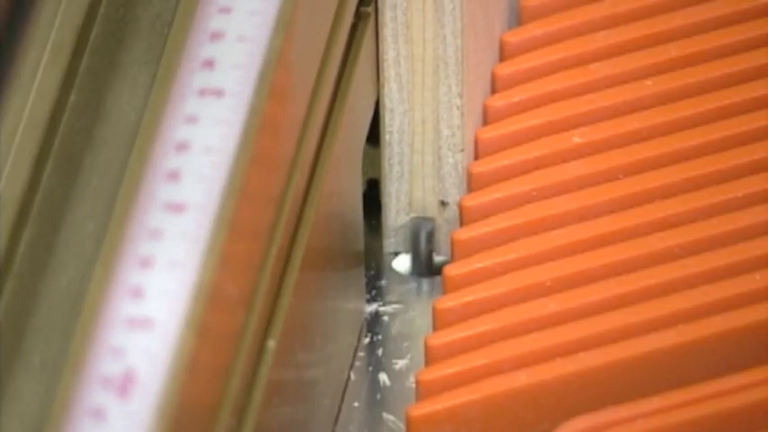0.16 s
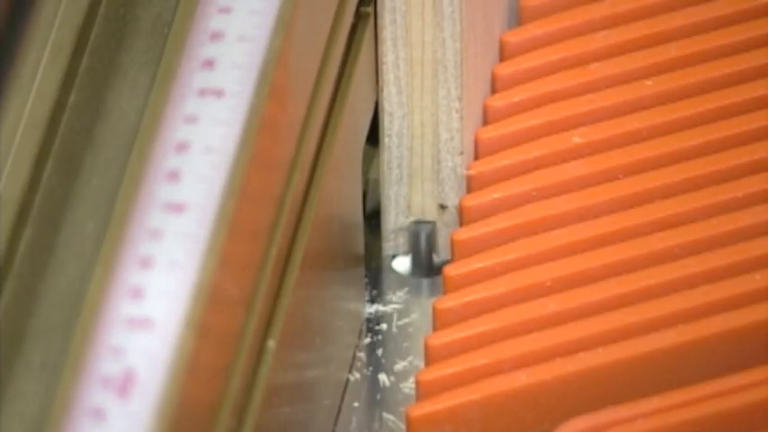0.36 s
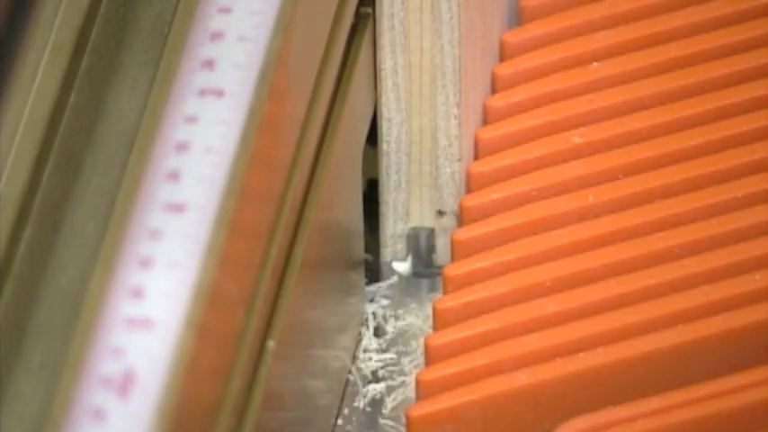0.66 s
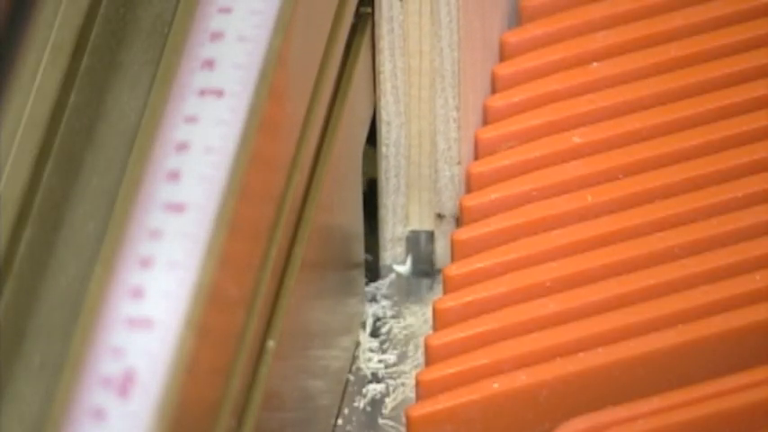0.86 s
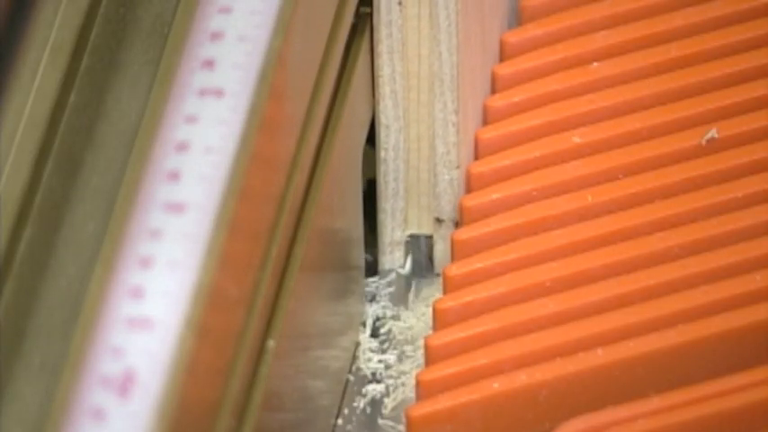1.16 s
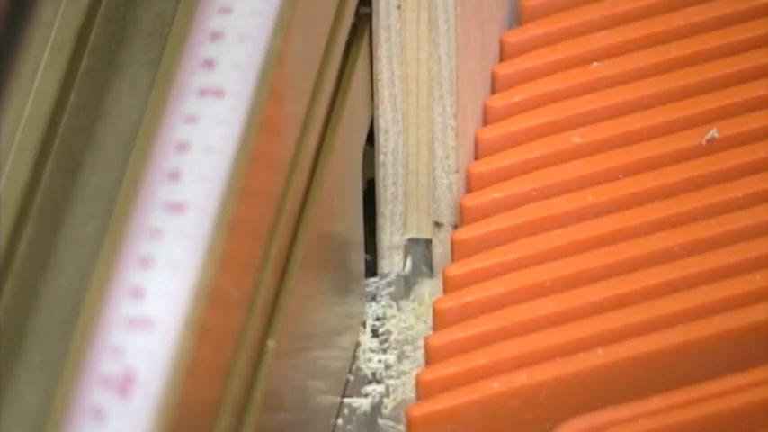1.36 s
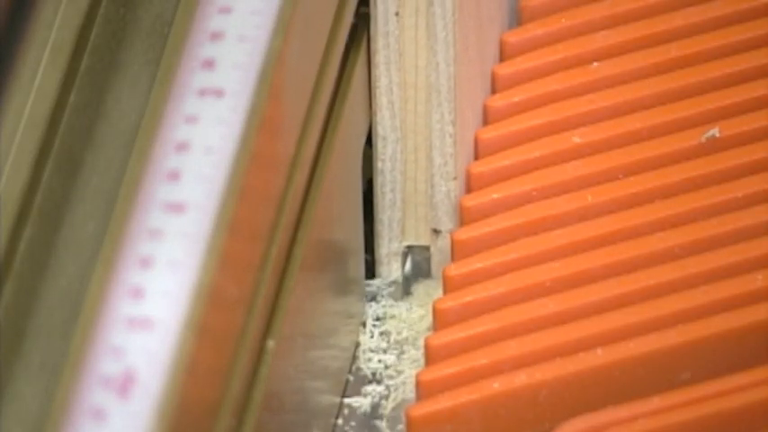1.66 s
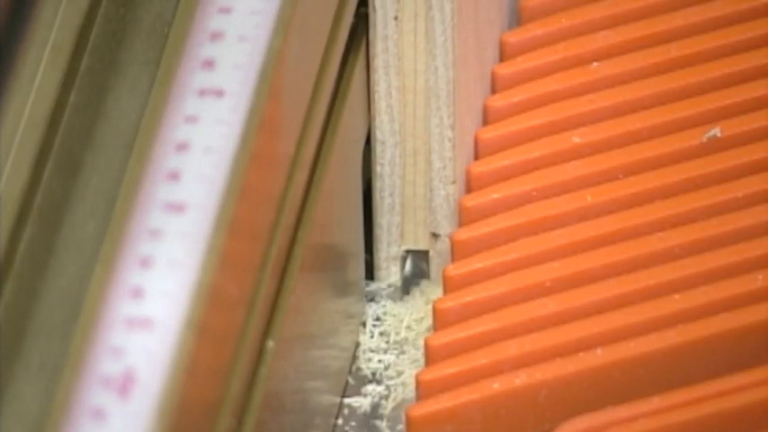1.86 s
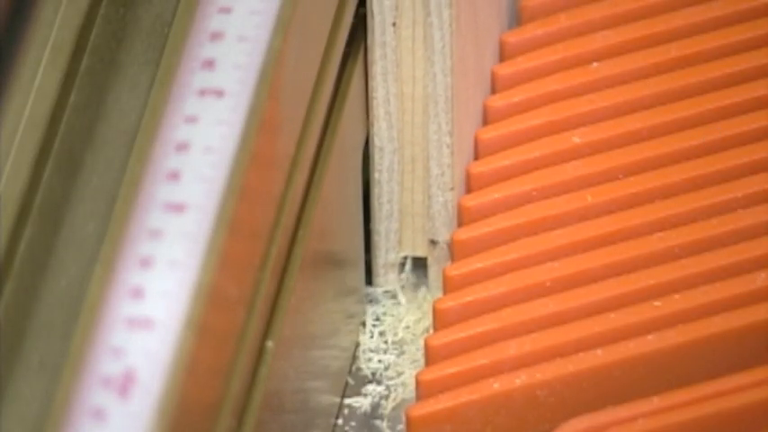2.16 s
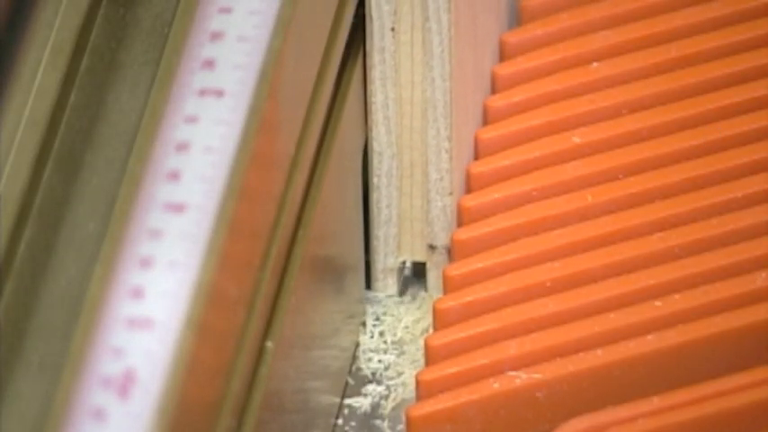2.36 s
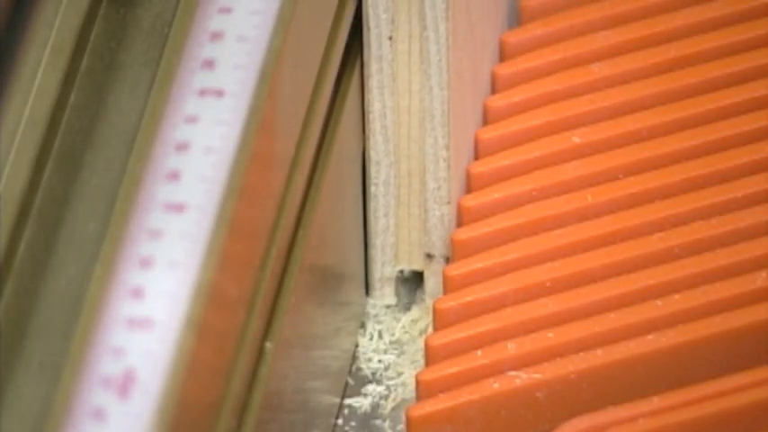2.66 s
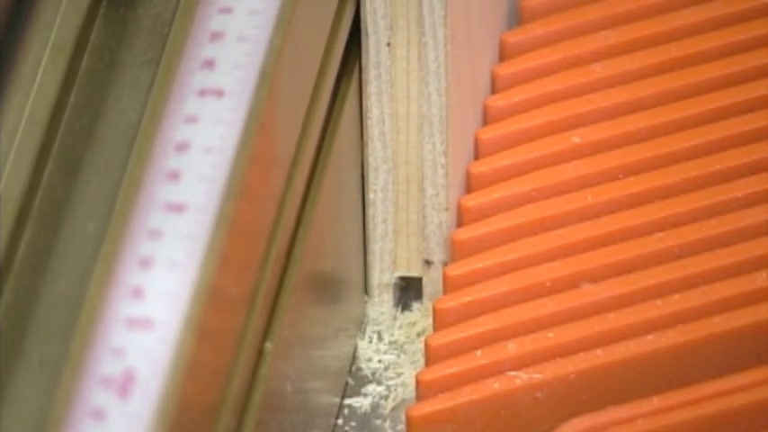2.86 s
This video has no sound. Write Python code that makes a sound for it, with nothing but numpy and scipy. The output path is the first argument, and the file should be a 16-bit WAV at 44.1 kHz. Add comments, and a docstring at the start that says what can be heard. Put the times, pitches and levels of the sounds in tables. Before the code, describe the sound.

A router under a table idles for an instant with whirring fan air, then its bit enters plywood and screams in a bright, rough buzz that turns duller and grittier; close stereo microphone, small workshop.

```python
"""First the idle of a router under a table, all fan air, motor tones and mains hum; then its bit bites into plywood.
One blow per turn of the shaft, a stack of overtones, rings the bit and drums the board. Tearing fibres, noise gated
by the turns, hiss in step with it, and the shaft slows a little under load. A soft thud and a low rumble come
through the table. A small stereo microphone stands near, in a workshop heard as a short tail of noise."""
import sys
import numpy as np
from scipy import signal
from scipy.fft import rfft, irfft, next_fast_len
from scipy.io import wavfile
from scipy.ndimage import uniform_filter1d, map_coordinates

SR = 44100
rng = np.random.default_rng(int(sys.argv[2]) if len(sys.argv) > 2 else 0)


def dump_mix(stems):
    """Bounce the given channels to the path in sys.argv[1] as a 16-bit WAV at rate SR."""
    frames = np.atleast_2d(stems).T  # one column per channel
    limited = np.clip(frames, -1, 1)  # hard clip at full scale
    pcm = np.round(limited * 32767).astype(np.int16)
    wavfile.write(sys.argv[1], SR, pcm)


def how_loud(loudness_db):
    """Turn decibels into a plain amplitude multiplier (0 dB gives 1, 20 dB gives 10)."""
    steps = np.asarray(loudness_db, float) / 20
    return 10 ** steps


N = 132300  # samples, 3 s
BITE_S = 0.1103  # the bit meets the wood

# Left-right likeness of the noises: pitch_hz, likeness (1 = same in both)
LIKENESS = [(60, 0.12), (250, 0.16), (600, 0.27), (2000, 0.8), (5000, 1), (9000, 0.44), (13000, 0.012)]
# Rumble through the table, relative: pitch_hz, level_db (per Hz)
TABLE_RUMBLE = [(12, -31), (20, 4), (38, -2), (113, -2), (130, -15), (170, -36), (290, -120)]
# Cooling air, relative: pitch_hz, level_db (per Hz)
COOLING_AIR = [(90, -50), (140, -22), (380, -4), (650, 0), (1000, -2), (2000, -8), (2700, -12), (3300, -15),
               (3900, -23), (5000, -19), (7000, -24), (15600, -32)]
# Motor tones, relative: shaft_multiple, level_db, left_over_right_db
MOTOR_TONES = [(1, -50, 9), (12, -28.5, 0), (15, -45, 0)]
# Mains hum, relative: pitch_hz, level_db
MAINS_HUM = [(240, -48), (360, -42)]
# Shaft speed before its small waver: time_s, turns_hz (per second)
SHAFT_SPEED = [(0, 163.3), (.15, 163.2), (.4, 162.65), (.76, 161.7), (1.14, 160.95), (1.55, 160.65),
               (1.95, 160.55), (2.3, 160.75), (2.65, 161.0), (3, 161.2)]
# Steady tones of the board, multiples of the shaft speed: shaft_multiple
BOARD_MULTIPLES = (2, 5, 9, 7, 11)
# Their phase, left ahead and right behind by this much: lead_rad
BOARD_LEAD_RAD = [0.6, .3, 0.23, .3, .25]
# Their relative levels: time_s, then one level_db for each of BOARD_MULTIPLES
BOARD_HUM = [(0.12, -39.5, -33.5, -41, -35.5, -39), (0.37, -47, -48.5, -48, -35, -44),
             (0.63, -38.5, -25.5, -43, -29.5, -30), (0.94, -37, -43, -38.5, -43, -35.5),
             (1.04, -34.5, -33.5, -29, -35, -32), (1.45, -34.5, -30.5, -38.5, -38, -33),
             (2.3, -31, -34.5, -39.5, -44.5, -36.5), (2.5, -30.5, -31, -32.5, -38, -33),
             (3.0, -31.5, -35.5, -29.5, -36, -28)]
# Resonances of the buried bit: pitch_hz, half_width_hz, level_db (relative)
BIT_RESONANCES = [(2555, 55, 0), (2365, 70, -2)]
# Tearing fibres, relative: pitch_hz, level_db (per Hz)
FIBRE_HISS = [(170, -24), (400, -12), (700, -8), (1300, -6), (2000, -7), (2500, -5), (3300, -10),
              (4600, -8), (5600, -9.5), (7000, -12), (10500, -15), (12500, -21), (15600, -38)]
# How ragged the cut is: time_s, tearing_over_blows_db
RAGGEDNESS = [(.12, -6), (.25, -14), (.6, -10.5), (.9, -4), (1.15, -8), (1.3, -9), (1.5, -5), (1.76, -2),
              (2.0, -4), (2.75, 1), (3.0, 0)]
# Rings of the opening slot: time_s, lower_centre_hz, upper_centre_hz
SLOT_RINGS = [(.12, 2450, 4600), (.22, 2500, 4560), (.34, 2500, 4950), (.52, 2900, 5000), (.62, 2900, 4560),
              (.7, 2900, 4560), (.76, 2560, 4600), (.9, 2600, 4600)]
# Overtones of the blow, relative: shaft_multiple, entering_db, buried_db
BLOW_OVERTONES = [(3, -9, -8), (4, -13, -1), (6, -16, -14), (8, -13, -4), (10, -15, -10), (12, -13, -15),
                  (13, -12, -14), (14, -8, -15), (15, 1, -13), (16, 0, -2), (17, -2, -5), (18, 0, -7),
                  (19, -3, -8), (20, -6, -4), (21, -7, -6), (22, -13, -9), (23, -9, -7), (24, -9, -20),
                  (25, -6, -11), (26, -3, -6), (27, -7, -4), (28, -1, -6), (29, -3, -9), (30, -1, -8),
                  (31, 0, -2.5), (32, -5, -2), (33, -5, -13), (34, -4, -6), (35, -10, -10), (36, -6, -7),
                  (37, -8, -15), (38, -11, -16)]
# The cut, before its quick swells: time_s, board_drumming_db, bit_ring_db, treble_bite_db, top_hiss_db
CUT_LEVELS = [(0.12, -29, -17, -15, -25.5), (0.21, -31, -18.5, -18, -26), (0.37, -37, -17, -21.5, -28),
              (0.66, -25.5, -20, -21, -26.5), (0.81, -21.5, -19, -20, -27.5), (0.92, -29, -23, -25, -33),
              (1.05, -24, -20.5, -21, -27.5), (1.23, -26.5, -20.5, -23.5, -28.5),
              (1.27, -17, -20, -20, -27.5), (1.34, -29.5, -24, -20, -29.5), (1.4, -24, -25, -20, -27.5),
              (1.7, -23.5, -21, -22.5, -29.5), (1.78, -18.5, -20, -22.5, -28.5),
              (1.84, -26, -24, -26.5, -33.5), (1.96, -18.5, -20.5, -23.5, -28.5),
              (2.28, -24, -22, -25.5, -31), (2.36, -21, -19, -23, -29.5), (2.75, -19, -23.5, -28, -32),
              (3.0, -22, -21.5, -26, -32.5)]
# Balance of the microphone: pitch_hz, left_over_right_db
MICROPHONE_BALANCE = [(60, 6), (180, 5.5), (550, -0.5), (1650, -2), (4970, -1.5), (15000, -1.0)]


def unit(x):
    """Scaled to rms 1."""
    return x / np.sqrt(np.mean(x ** 2) + 1e-20)


def along(points, hz):
    """Reads (Hz, value) points on a log frequency axis."""
    point_hz, value = np.transpose(points)
    return np.interp(np.log(hz + 1), np.log(point_hz + 1), value)


def curves(rows):
    """One value per sample for each column after the time."""
    s, *columns = np.transpose(rows)
    return [np.interp(np.arange(N) / SR, s, column) for column in columns]


def wobble(rate, size=1):
    """A smooth random curve, rate knots a second, one value every size samples."""
    knots = rng.standard_normal(int(N * rate / SR) + 4)
    return map_coordinates(knots, [np.arange(0, N, size) * rate / SR])


def filtered(x, response):
    """x times a response of frequency."""
    m = 2 * next_fast_len(N // 2 + 8192)
    return irfft(rfft(x, m) * response(np.fft.rfftfreq(m, 1 / SR)), m)[..., :N]


def patchy(x, depth_db, bins=3, frames=10):
    """Random patches of gain over time and frequency."""
    z = signal.stft(x, nperseg=1024, noverlap=768)[2]
    field = uniform_filter1d(rng.standard_normal(z.shape[-2:]), size=bins, axis=0)
    field = uniform_filter1d(field, size=frames, axis=1)
    return signal.istft(z * how_loud(depth_db * unit(field)), nperseg=1024, noverlap=768)[1][..., :N]


def rush(spectrum):
    """Stereo noise of rms 1: mid and side are shared out so that left and right are partly alike."""
    def mid_side(hz):
        turn = np.arccos(np.clip(along(LIKENESS, hz), -1, 1)) / 2
        return how_loud(along(spectrum, hz)) * [np.cos(turn), np.sin(turn)]

    mid, side = filtered(rng.standard_normal((2, N)), mid_side)
    return unit(np.array([mid + side, mid - side]))


def room(x):
    """The workshop's answer: a noise tail that falls 60 dB in 0.22 s, starting after 4 ms."""
    t = np.arange(SR // 2) / SR
    tail = rng.standard_normal((2, len(t))) * how_loud(-60 * t / .22) * (t > .004)
    return signal.fftconvolve(x[None], tail / np.linalg.norm(tail[0]), axes=1)[:, :N]


def table():
    """Steady rumble through the table, with a decaying low sine as the thud of the first bite."""
    thud_db, thud_hz, thud_t60_s = -46, 32, 0.28
    rumble_db = -66
    t = np.maximum(np.arange(N) / SR - BITE_S, 0)
    thud = how_loud(thud_db - 60 * t / thud_t60_s) * np.sin(2 * np.pi * thud_hz * t)
    return thud + how_loud(rumble_db) * rush(TABLE_RUMBLE)


def motor(turns):
    """Cooling air as patchy noise, shaft and fan tones locked to the turns, mains hum at fixed pitches."""
    air_db = -24.5  # at idle
    loaded_db, loaded_s = -3, 0.093  # air and tones sink back once the cut starts
    t = np.arange(N) / SR
    air = how_loud(air_db + 0.27 * wobble(8.6)) * unit(patchy(rush(COOLING_AIR), depth_db=4.0))
    tones = 0
    for k, db, pan_db in MOTOR_TONES:
        pan = np.array([[pan_db / 2], [-pan_db / 2]])
        tones = tones + how_loud(db - 3.5 + 1.4 * wobble(8.93) + pan) * np.sin(2 * np.pi * k * turns)
    sink = how_loud(loaded_db * np.clip((t - BITE_S) / loaded_s, 0, 1))
    mains = sum(how_loud(db - 5 + 3.0 * wobble(7.5)) * np.sin(2 * np.pi * hz * t) for hz, db in MAINS_HUM)
    return sink * (air + tones) + mains


def buried(t):
    """How far the bit is in, 0 at 0.31 s to 1 at 0.88 s."""
    from_s, to_s = 0.31, 0.88
    return np.clip((t - from_s) / (to_s - from_s), 0, 1)


def board_hum(turns):
    """The board's steady tones: multiples of the shaft speed, left a little ahead of right in phase."""
    side = np.array([[1], [-1]])
    hum = 0
    for k, db, lead in zip(BOARD_MULTIPLES, curves(BOARD_HUM), BOARD_LEAD_RAD):
        size = how_loud(db + 5.5 + 0.31 * k * wobble(12))
        phase = 2 * np.pi * k * turns + lead * side + 0.15 * wobble(12)
        # dividing by cos(lead) keeps the sum of left and right as strong
        hum = hum + size * np.cos(phase) / np.cos(lead)
    return hum


def chatter():
    """The bit's own resonances: narrow noise shaken in quick uneven bursts, growing as it buries itself."""
    bursts_db, swing_db, bursts_rate = -10.5, 3.5, 30  # before the cut is levelled; rate in knots per second
    modes = 0
    for hz, width_hz, db in BIT_RESONANCES:
        ringing = filtered(rng.standard_normal(N), lambda f: 1 / (1 + ((f - hz) / width_hz) ** 2))
        modes = modes + how_loud(db) * unit(how_loud(swing_db * wobble(bursts_rate)) * ringing)
    return how_loud(bursts_db) * buried(np.arange(N) / SR) * modes


def fibres(turns):
    """Tearing fibres: noise that jumps up at each turn of the shaft and sinks to half before the next."""
    gate_depth, gate_sharp = .5, 3.5
    gate = 1 - gate_depth + gate_depth * np.exp(-gate_sharp * (turns % 1))
    return unit(patchy(rush(FIBRE_HISS) * gate, depth_db=0.5, bins=9, frames=8))


def blows(turns, speed_hz):
    """The blow once a turn as overtones that waver apart; its colour changes as the bit buries itself."""
    step = 64  # samples between slow control values
    highest, fall_db = 66, -.55  # overtones past the table, below this multiple, fade by this step
    slot_db, slot_width_hz = 6, 250
    dull_hz, dull_db = 2100, -6  # late in the cut, from 2.25 to 2.6 s, the overtones above dull_hz sink
    samples = np.arange(N)
    at = np.arange(0, N, step)
    depth = buried(at / SR)

    def deepening(entering, in_wood):
        return np.interp(depth, [0, 1], [entering, in_wood])

    waver_db, flutter_db = deepening(2.2, 1.5), deepening(1.6, 3)  # slow and quick
    smear_rad = deepening(.9, 1.15)  # spread of the overtone phases
    sinking_db = np.interp(at / SR, [2.25, 2.6], [0, dull_db])
    slots_hz = np.array(curves(SLOT_RINGS))[:, at]
    last, *last_db = BLOW_OVERTONES[-1]
    more = [(k, *(np.array(last_db) + fall_db * (k - last))) for k in range(last + 1, highest)]
    out = np.zeros((2, N))
    for k, entering_db, buried_db in BLOW_OVERTONES + more:
        hz = k * speed_hz[at]
        nearness = np.exp(-((hz - slots_hz) / slot_width_hz) ** 2).sum(0)
        level_db = entering_db + depth * (buried_db - entering_db) + (1 - depth) * slot_db * nearness
        size = how_loud(level_db + waver_db * wobble(4.75, size=step) + flutter_db * wobble(24.23, size=step))
        phase = smear_rad * rng.normal() + .3 * wobble(15, size=step)
        apart = .28 * (rng.normal() + wobble(3.865, size=step))  # left-right spread, rad
        dulling = np.interp(samples, at, how_loud(sinking_db * (hz > dull_hz)))
        tone = np.exp(2j * np.pi * k * turns) * dulling
        for channel, way in enumerate((1, -1)):
            control = size * np.exp(1j * (phase + way * apart))
            out[channel] += (np.interp(samples, at, control) * tone).real
    # held to an even level over a quarter of a second
    return out / np.sqrt(np.abs(uniform_filter1d(np.mean(out ** 2, 0), size=SR // 4)))


def cutting(turns, speed_hz):
    """Blows and tearing, shared out between board, bit, bite and hiss, over the board's hum."""
    edges_hz = (330, 1950, 3850, 7000, SR)  # between drumming, ring, bite and hiss
    rise_s = 0.0069
    graze_s, graze_share = 0.014, 0.086  # the edge grazes the wood just before it bites
    knock = blows(turns, speed_hz)
    tearing = how_loud(curves(RAGGEDNESS)[0]) * fibres(turns)
    mix = knock + how_loud(-11) * room(knock.mean(0)) + tearing + chatter()

    def band_shapes(hz):
        lowpasses = np.array([1 / (1 + (hz / edge) ** 12) for edge in edges_hz])
        return np.diff(lowpasses, axis=0)[:, None]

    bands = filtered(mix[None], band_shapes)
    # each band is levelled over a fifth of a second, then follows its column of the table
    power = uniform_filter1d(np.mean(bands ** 2, 1, keepdims=True), size=SR // 5)
    bands = bands / np.sqrt(np.abs(power))
    levels_db = np.array(curves(CUT_LEVELS)) + 1.1 * np.array([wobble(21.85) for _ in bands])
    parts = np.sum(how_loud(levels_db)[:, None] * bands, 0)
    swell = how_loud(.5 * wobble(11.13) + 0.76 * wobble(30.51))
    since = np.arange(N) / SR - BITE_S
    graze = graze_share * np.clip(1 + since / graze_s, 0, 1)
    start = np.maximum(np.clip(since / rise_s, 0, 1), graze)
    return start * (swell * parts + board_hum(turns))


def scene():
    """Everything at the microphone, tones and blows driven by the one turning shaft."""
    speed_hz = curves(SHAFT_SPEED)[0] * (1 + .00025 * wobble(10))
    turns = np.cumsum(speed_hz) / SR
    return table() + motor(turns) + cutting(turns, speed_hz)


def low_pass(x):
    """Removes everything above the highest recorded frequency."""
    return signal.sosfilt(signal.butter(12, 15760, fs=SR, output="sos"), x)


def record(dry):
    """The stereo microphone: left-right balance, a narrow dip in its response, peaks rounded at the input."""
    dip_hz, dip_width_hz, dip_db = 3890, 95, -9.5
    ceiling = .95  # of full scale
    side = np.array([[.5], [-.5]])

    def response(hz):
        dip = dip_db / (1 + ((hz - dip_hz) / dip_width_hz) ** 2)
        return how_loud(side * along(MICROPHONE_BALANCE, hz) + dip)

    heard = filtered(dry, response)
    rounded = heard / (1 + np.abs(heard / ceiling) ** 6) ** (1 / 6)
    return low_pass(rounded)


dry = scene()
out = record(dry)
dump_mix(out)
```